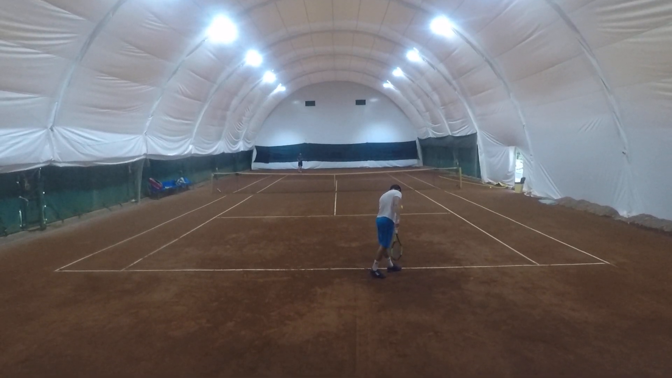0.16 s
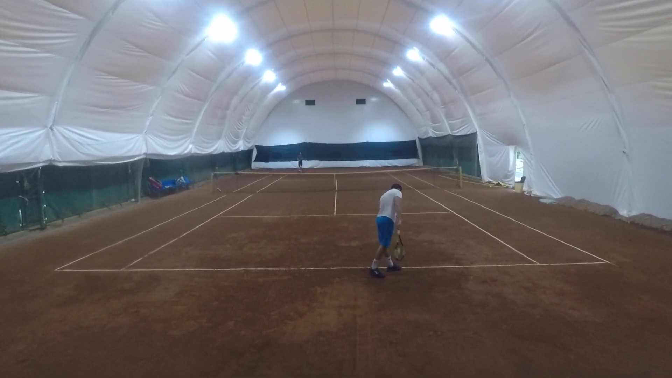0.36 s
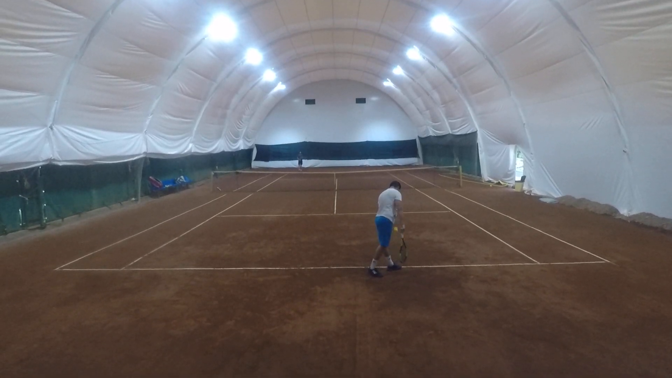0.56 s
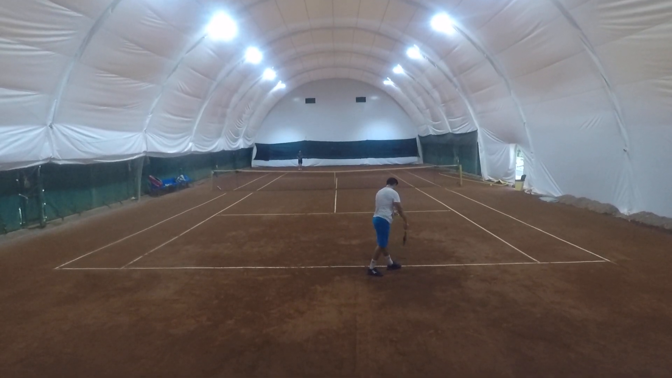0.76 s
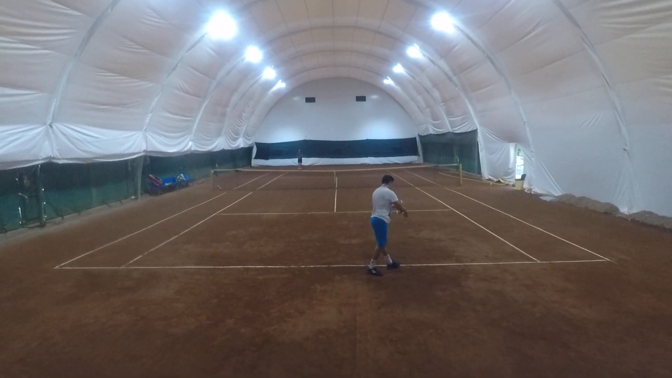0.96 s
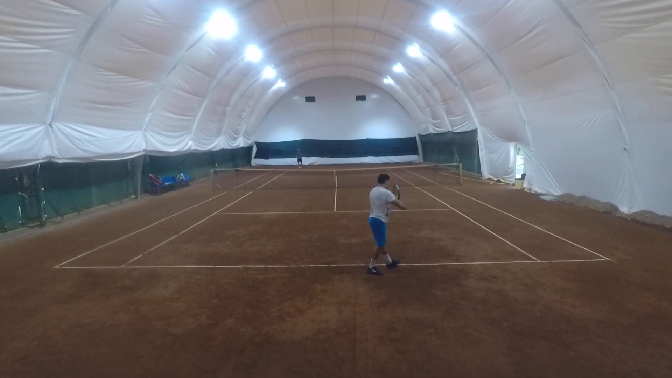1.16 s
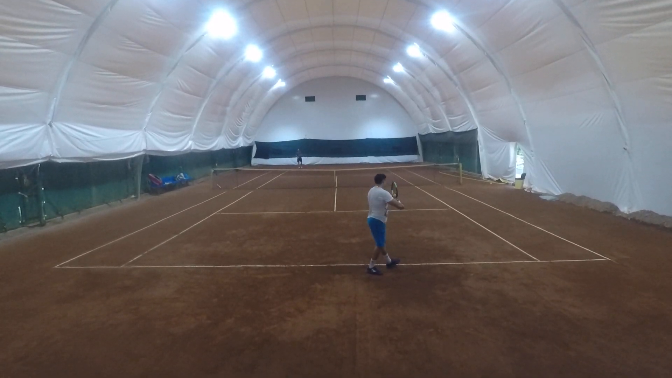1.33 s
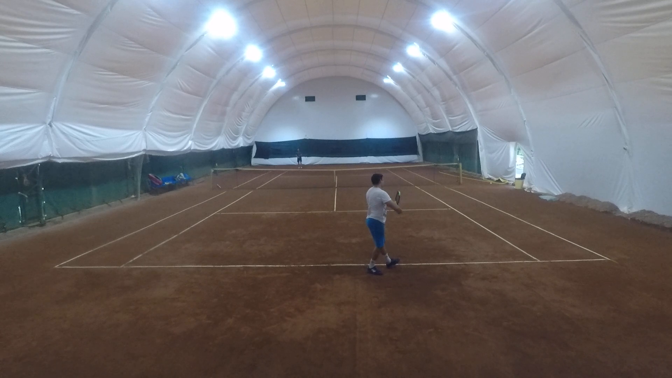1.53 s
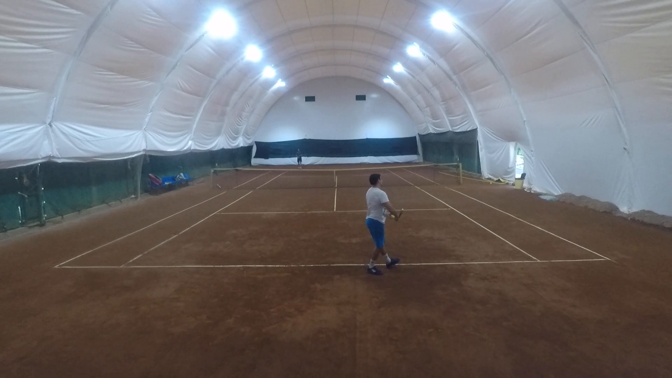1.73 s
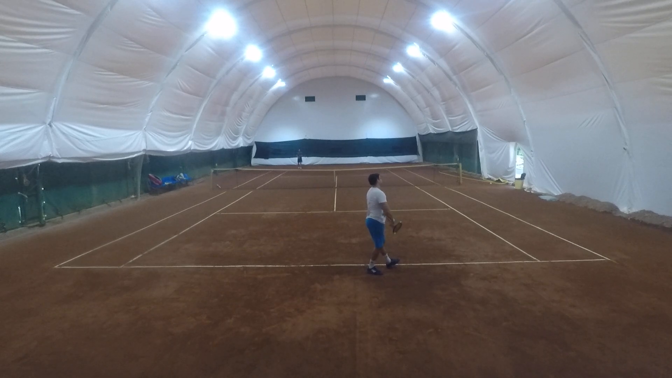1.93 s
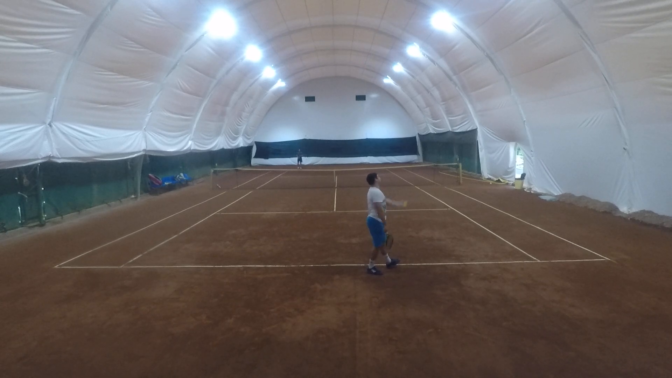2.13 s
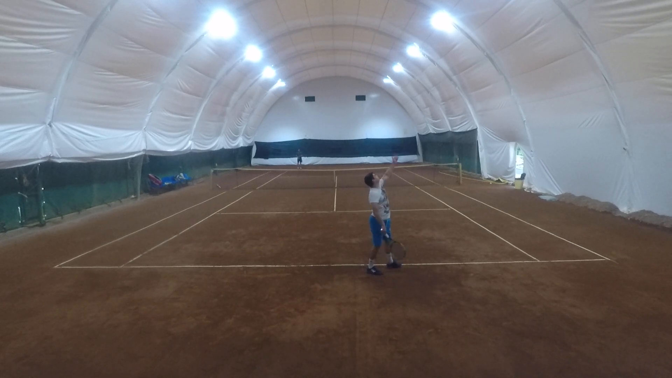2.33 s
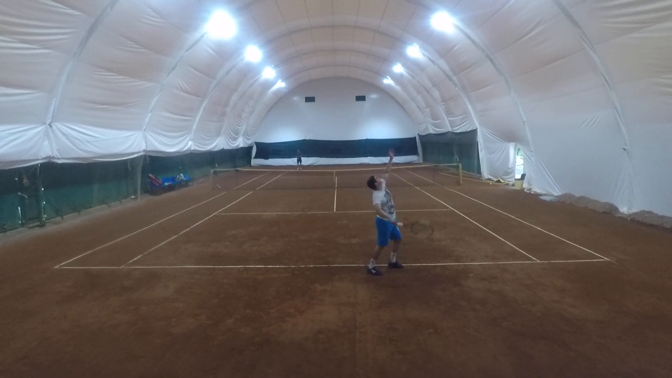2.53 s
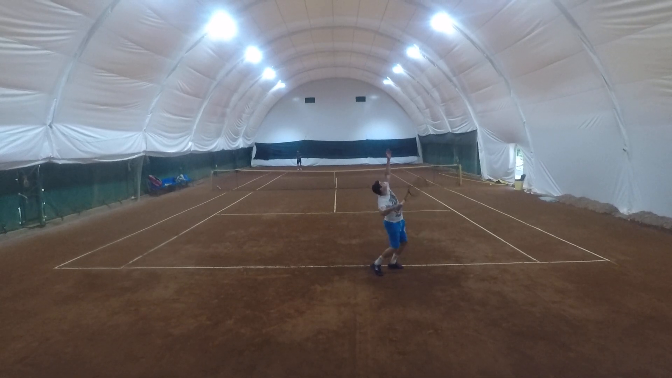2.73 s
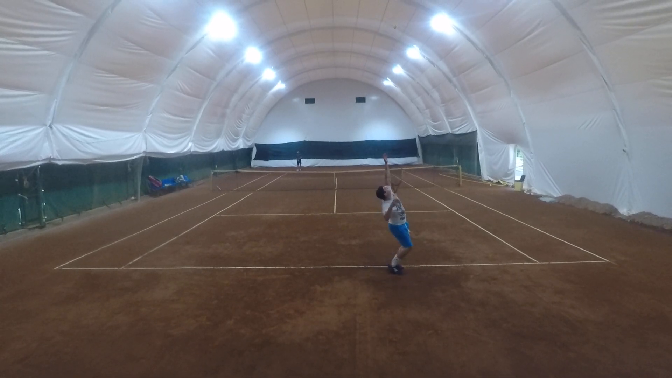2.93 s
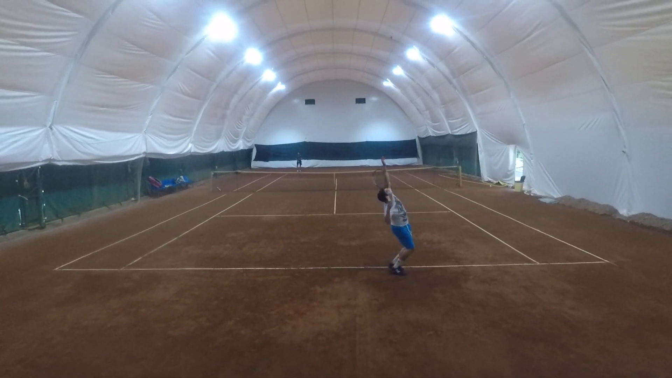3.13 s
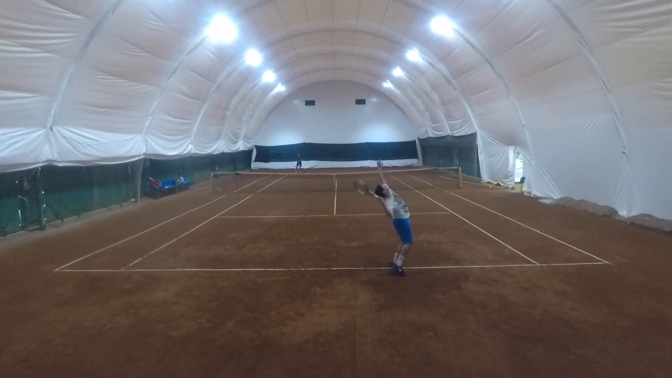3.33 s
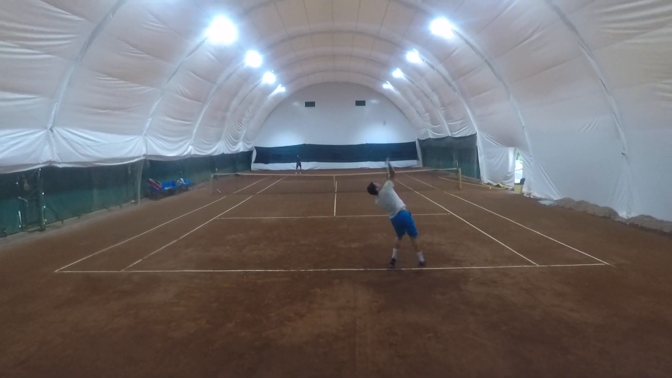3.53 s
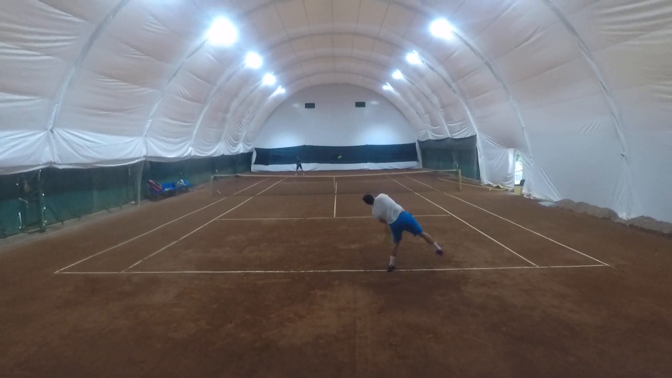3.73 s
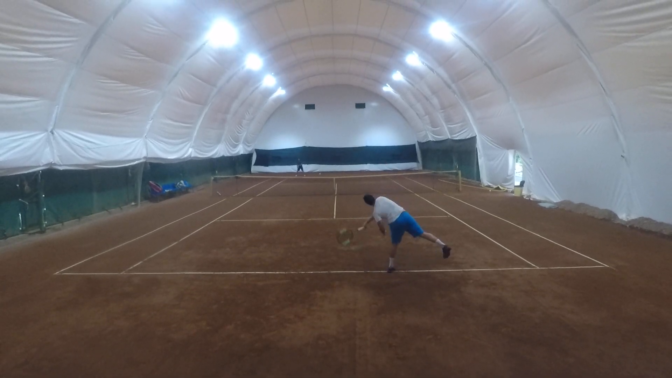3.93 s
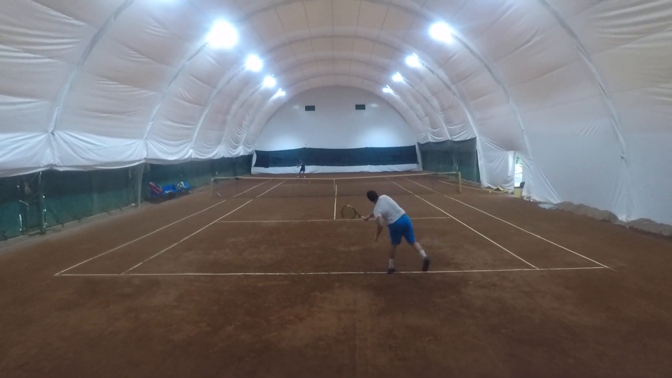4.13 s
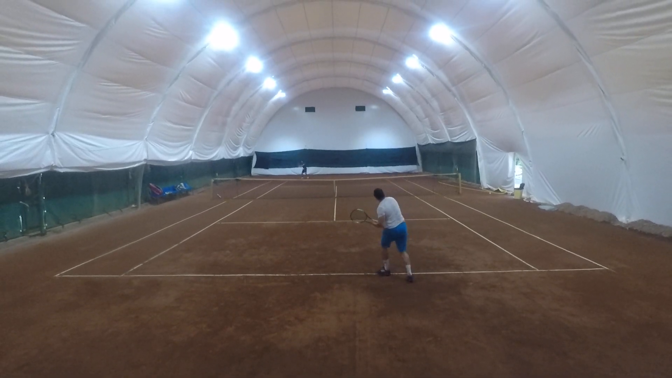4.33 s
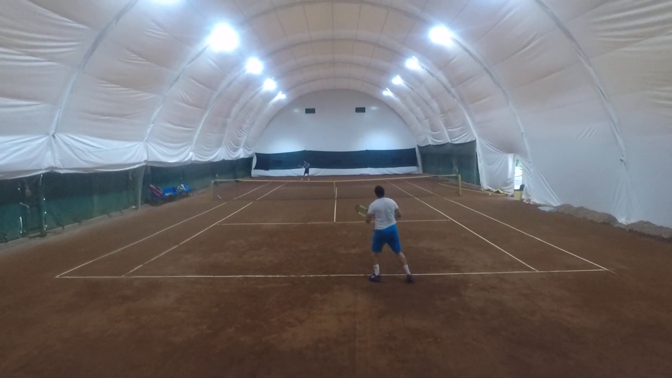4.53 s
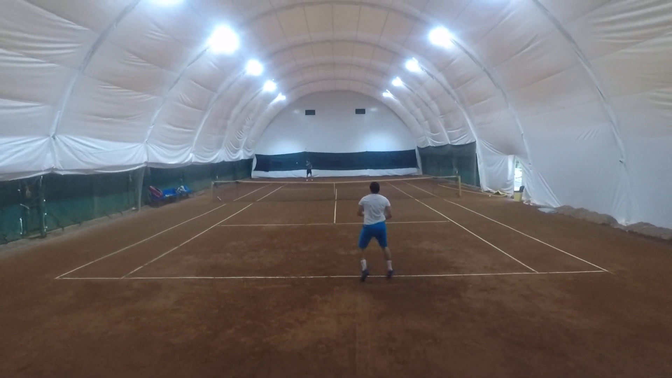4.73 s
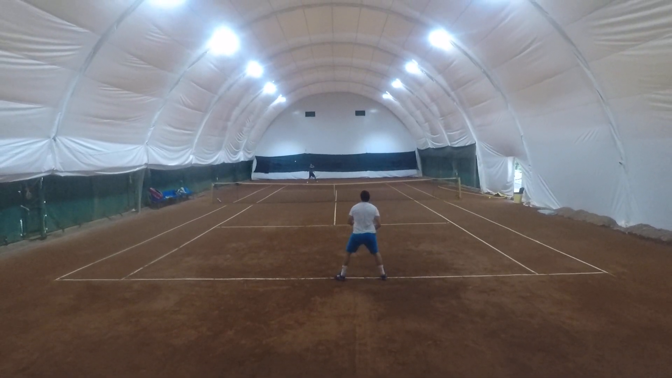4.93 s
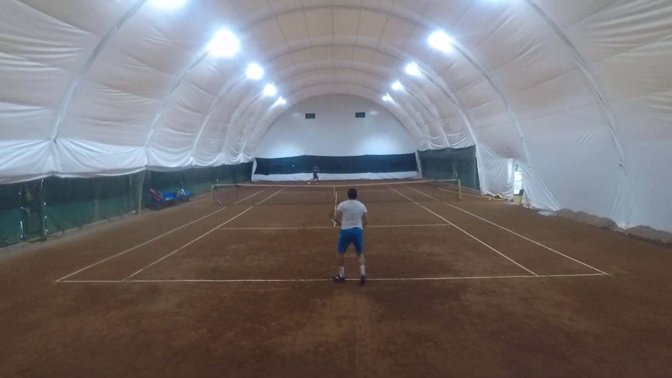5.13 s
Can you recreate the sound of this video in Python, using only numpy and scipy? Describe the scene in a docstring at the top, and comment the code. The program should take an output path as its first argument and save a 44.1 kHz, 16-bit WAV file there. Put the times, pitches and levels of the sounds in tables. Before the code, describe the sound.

Soft knocks and gritty scuffs over a fading hollow rumble, then a sharp racket hit, fluttering wall echoes, and a distant return stroke.

```python
"""Inflated fabric dome: a tennis serve heard by a small camera behind the baseline.
Hiss, frame ticks and rumble come from the camera; earlier strokes hang on as decaying coloured noise.
Knocks, jogging and dry ticks excite resonances; short cracks over thumps tap; a far stroke washes in.
The racket cracks (noise spray, ringing strings, short low thump), curved walls return noise bursts and
a long rush, and the return stroke renews it.
"""
import sys
import numpy as np
from scipy import signal
from scipy.fft import rfft, irfft, next_fast_len
from scipy.io import wavfile
from scipy.ndimage import uniform_filter1d

SR = 44100
rng = np.random.default_rng(int(sys.argv[2]) if len(sys.argv) > 2 else 0)


def dump(signal):
    """Clip the signal to [-1, 1] and save it as 16-bit WAV at the path in sys.argv[1]."""
    limited = np.clip(np.atleast_2d(signal).T, -1, 1)
    pcm = np.round(limited * 32767).astype(np.int16)
    wavfile.write(sys.argv[1], SR, pcm)


N = 228217

FRAME_RATE_HZ = 30000 / 1001
HISS_DB, TOP_HZ, LOW_CUT_HZ = -64.5, 15000, 129.8
GRIT_FROM_S, GRIT_TO_S, GRIT_COUNT = 0.43, 0.9, 26
GRIT_FLOOR_DB, GRIT_SPREAD_DB, GRIT_LOW_DB = -44.5, 4.5, -1

# Noise colours, all (frequency [Hz], relative density [dB])
# camera: microphone hiss, deep and upper rumble
HISS_COLOUR = [(1470, -24), (2500, 15.5), (2930, -33), (4840, -22.5), (5210, -47), (5790, -1), (7870, 2.5),
               (8680, 7), (13400, -5.5), (14300, -30), (15000, -32)]
DEEP_RUMBLE_COLOUR = [(13, -43), (22, -5), (50, 6), (70, -27), (120, -120)]
UPPER_RUMBLE_COLOUR = [(30, -120), (52, -25), (66, -4.5), (97, 0.5), (115, -3), (150, -67), (250, -120)]
# dome boom: fading, far, served
FADING_BOOM = [(62, -39), (105, -41), (118, -14), (135, 7), (156, -4.5), (243, -7), (472, -18), (504, -9.5),
               (600, -20), (780, -23), (1320, -120)]
FAR_BOOM = [(62, -75), (105, -30), (139, -1.5), (166, 1.5), (291, -8), (435, -7.5), (507, -16), (600, -15),
            (780, -19), (1320, -120)]
SERVED_BOOM = [(62, -120), (105, -25), (135, 6), (183, -5), (243, -7), (335, -3), (368, -4.5), (399, -1.5),
               (500, -6), (580, -13), (660, -120)]
# dome body: fading, rustle, far, served
FADING_BODY = [(320, -63), (550, -42), (575, -22), (739, -18), (881, -2.5), (1060, -1), (1150, -6),
               (1240, -3), (1310, -6), (3200, -24.5), (4160, -43), (7040, -120)]
RUSTLE_BODY = [(320, -38), (550, -14), (728, -7), (964, -7), (1100, -12), (1300, -3.5), (1860, -9),
               (2480, -2.5), (2720, -10), (3540, -9.5), (4200, -20), (5460, -44), (9240, -120)]
FAR_BODY = [(320, -21), (550, -9), (875, -1.5), (956, -5), (1520, -6), (1710, -4.5), (1830, -6),
            (3200, -15), (4160, -35), (7040, -120)]
SERVED_BODY = [(330, -30), (560, -6), (643, -5), (778, 0.5), (961, 0), (1210, -2), (1490, -7),
               (2360, -10.5), (2810, -16.5), (3200, -16), (4160, -23), (7040, -120)]
# dome sizzle; spray of the racket blow
SIZZLE = [(1760, -8.5), (3000, -2), (3470, 0), (3910, -2), (5150, -2.5), (6150, -0.5), (7400, -4),
          (10000, -23), (11300, -34), (13000, -34), (13800, -52), (14500, -64)]
CRACK = [(1290, -26), (2200, -3), (2250, -3), (2440, -13), (3310, -3), (5070, -9), (6720, 0.5), (8620, -13),
         (13000, -26), (15000, -25)]

# Microphone ports in a diffuse field:
# (frequency [Hz], likeness before scaling [0-1], left lead [rad], left-right [dB])
PORTS = [(30, 0.8, .3, -3), (70, 0.6, 0.66, 2.5), (158, 0.7, 1.25, 1), (306, 0.47, 0.45, -1.5),
         (480, 0.5, 0.41, 6.5), (617, 0.52, 4.95, -3), (970, 0.43, 4.5, -1.5), (1480, 0, 4.3, 0),
         (2230, 0.26, 7, 1.5), (3670, 0.53, 6.34, -0.5), (5200, 0.5, 5.2, -1), (8000, 0.05, 3.5, -2)]
# Camera rumble: (time [s], deep level [dB], upper level [dB])
RUMBLE_LEVELS = [(0.0, -65, -58), (0.06, -82, -83), (0.6, -74, -65), (0.86, -49, -43), (0.98, -48, -52.5),
                 (1.77, -56, -53.5), (1.8, -56, -39), (1.93, -56, -59), (3.28, -68, -67), (3.99, -69, -62),
                 (4.26, -51, -47), (4.61, -43, -36.5), (4.81, -43, -26.5), (4.85, -31, -39),
                 (4.88, -45, -35), (4.91, -46, -31), (5.07, -37, -40), (5.17, -42, -44)]

# Dome decay: boom, body, sizzle t60 [s]
DOME_T60_S = [4.5, 5.96, 2.35]
# Unceasing rush: boom, body, sizzle level [dB]
STEADY_DB = [-46.5, -56, -62.5]
# Strokes and bounces filling the dome:
# (time [s], build-up [s], boom [dB], body [dB], sizzle [dB], colour)
WASHES = [(-0.3, 0.046, -32.5, -36.5, -57, "fading"), (2.815, 0.047, -41, -42, -41.5, "rustle"),
          (2.865, 0.023, -40.5, -34, -38.5, "far"), (3.635, 0.023, -22.5, -37, -42, "served"),
          (3.71, 0.038, -21.5, -22.5, -31, "served"), (4.26, 0.0069, -41, -30, -37.5, "served"),
          (4.45, 0.05, -24.5, -35, -44.5, "served"), (4.712, 0.013, -27, -30, -38, "served"),
          (4.77, 0.051, -29.5, -26.5, -33, "served")]
# Feet, cloth and the racket cutting the air:
# (time [s], build-up [s], t60 [s], boom [dB], body [dB], sizzle [dB], colour)
SHUFFLES = [(0.45, 0.03, 1.76, -25, -35.5, -54, "fading"), (0.69, 0.016, 1.1, -23, -33.5, -54, "fading"),
            (2.32, 0.04, 3.3, -47, -58, -60, "rustle"), (2.385, 0.014, 4.6, -42.5, -48, -58, "rustle"),
            (2.43, 0.008, 0.18, -38, -52, -50, "rustle"), (2.482, 0.005, 0.66, -36, -49, -63, "rustle"),
            (3.39, 0.017, 0.83, -36.5, -54, -42.5, "far"), (3.56, 0.022, 0.43, -23, -38, -31, "far")]

# Resonances, all (frequency [Hz], width [Hz], level [dB], left lead [rad], left-right [dB])
# mount: ringing modes, dead thud, loose parts
MOUNT_MODES = [(146.8, 19.7, 9.5, 1.43, 4), (235, 32, -3.5, 3.8, 17), (438, 13.2, 8.5, 2.76, 10),
               (502.3, 11.3, 9, 2.77, 4)]
THUD_MODES = [(323, 174, -13, 4.1, 9.8)]
RATTLE_MODES = [(610, 97, -17, 7.1, 1), (1040, 170, -22, 3.6, -4), (1477, 100, 13, 2.48, -3.5),
                (2255, 150, 3, 1.5, 5.5), (3080, 160, -15, 3, -27), (6100, 620, -15, 2.3, -7)]
# dry ticks: lower and higher modes
TICK_LOW_MODES = [(1780, 430, -20, 0, 0), (2500, 210, -1, 0, 0), (3120, 270, -9.5, 0, 0)]
TICK_HIGH_MODES = [(4400, 880, -10, 0, 0), (5500, 520, -12, 0, 0), (6060, 280, -6, 0, 0),
                   (6800, 310, -11, 0, 0)]

# Knocks on the mount: (nominal time [s], level [dB], rattle [dB re level], dead thud [dB re level])
KNOCKS = [(0.145, -23.5, -33, 6.5), (0.378, -25.5, -28, -2), (0.497, -30, -4, -11), (0.518, -20, -11, -10),
          (0.56, -16.5, -15.5, -3), (0.623, -15.5, -22, -13), (0.653, -16.5, -15, -1), (0.701, -32, -5, 0),
          (0.7135, -23, -9, 16.5), (0.727, -14, -2, 6), (0.735, -12, -6.5, -6), (0.742, -24, -15, 5),
          (0.78, -17, -10, 1), (0.828, -18, -11.5, -25), (0.859, -17.5, -18, -17), (0.925, -26, -12, -10),
          (0.961, -28, -10.5, -11), (1.048, -29.5, -16, 2), (1.793, -13, -34, 8.5),
          (4.378, -12.5, -11, -22)]
# Shaking of the mount: (time [s], level [dB])
JOG = [(0.44, -48), (0.674, -56), (0.728, -23.5), (0.898, -54), (1.026, -35.5), (1.12, -78)]
# Dry ticks: (time [s], level [dB], lower modes [dB re level], left-right [dB])
TICKS = [(0.1417, -33.5, -24, -10), (0.3957, -31, -5.5, 11), (0.501, -23, -6.5, -4), (0.623, -40, 6, 0),
         (0.7134, -35, -14, -9), (1.3666, -22.5, -16.5, -10), (1.6247, -38.5, -5.5, 4.5),
         (1.792, -45.5, -5.5, -3), (2.4306, -40, 2, -1.0), (2.4464, -28, -16, -13), (2.4936, -40, 7.5, -4)]

# Short cracks over thumps: ball and feet on clay, a mount knock's click, the return stroke's thumps:
# (time [s], crack level [dB], thump [dB re crack], left-right [dB], thump frequency [Hz], thump t60 [s])
TAPS = [(0.4409, -23.5, 4, -1, 242, 0.024), (0.4657, -22.5, -24, 5, 180, 0.06),
        (0.4695, -25, -25, -16, 240, 0.06), (0.4812, -29, -3, 6, 174, 0.06),
        (1.7924, -35, -20, 0, 240, 0.034), (2.5055, -43.5, 20.5, -2, 180, 0.14),
        (2.5647, -41, 13, -3, 200, 0.053), (2.582, -46, 14.5, 0, 215, 0.15),
        (2.6502, -42, 11.5, 0.0, 167, 0.038), (4.224, -26, 11.5, -3, 170, 0.036),
        (4.7305, -22, 10, -1, 348, 0.032), (4.784, -23.5, 13, 4, 134, 0.15)]
# Modes of the short crack: (frequency [Hz], typical level [dB], t60 [s])
TAP_MODES = [(1107, 0, 0.016), (1436, 9, 0.0056), (2050, -3, 0.0082)]

# Wall slaps and the return stroke arriving from far:
# (nominal time [s], level [dB], boom [dB re level], sizzle [dB re level], left-right [dB])
SLAPS = [(3.6695, -25, -1, -2, 10), (3.684, -21, 2, -5.5, -14), (3.717, -12, -17, -6, 0.5),
         (3.7356, -16.5, -7, -10, -3), (3.767, -13, -22, -3, 1), (3.8034, -21, -13, -12, 5),
         (3.821, -16.5, 6.5, -6.5, 3), (4.044, -17, 8, -18, 8.5), (4.224, -22, -6, -9.5, 0),
         (4.265, -16.5, 0, -8.5, 0.0), (4.722, -12.5, 8.5, -12, -2), (4.757, -11.5, -8, -7.5, -6),
         (4.7805, -13.5, -9, -8.5, 2), (4.806, -13.5, -16, -14, 4), (4.847, -19.5, -1.5, -13.5, -20)]

# Racket crack and first hard reflections:
# (time [s], spray level [dB], knock [dB re spray], thump [dB re spray], thump length [s], left-right [dB])
STROKES = [(3.6005, -13.5, 4, 10, 0.0092, -5.5), (3.6055, -18, -2, 4, 0.0082, 8),
           (3.6195, -13, -19, 0, .011, -1), (3.6230, -23.5, 15, -3, .011, -9),
           (3.6318, -14, 0, -5, 0.014, -4), (3.6352, -27, 19, 21.5, 0.033, -5)]
# Low thump and string bed, both (frequency [Hz], typical level [dB], t60 [s])
THUMP_MODES = [(236, 10.5, 0.027), (352, 4.5, 0.028), (409, -5.5, 0.056)]
STRING_MODES = [(770, 9.5, 0.018), (1015, 3, 0.018), (1300, -2, 0.0068), (2400, -6, .008)]


def amp(db):
    """Amplitude factor from dB."""
    return 10 ** (np.asarray(db) / 20)


def unit(x):
    """Rms 1 in the mean of the channels."""
    return x / np.sqrt(np.mean(np.mean(x, axis=0) ** 2) + 1e-20)


def along(hz, f, v):
    """Points interpolated on a log frequency axis."""
    return np.interp(np.log(hz + 1), np.log(np.add(f, 1)), v)


def gains(rows):
    """One gain per sample for each dB column; -120 dB before the table, quick decay after it."""
    s, *columns = np.transpose(rows)
    t = np.arange(N) / SR
    after = np.clip(t - s[-1], 0, None)
    return [amp(np.interp(t, s, column, -120) - 60 * after / 0.12) for column in columns]


def filtered(x, response):
    """x through a complex frequency response."""
    m = next_fast_len(N + SR // 2)
    return irfft(rfft(x, m) * response(np.fft.rfftfreq(m, 1 / SR)), m)[..., :N]


def rush(spectrum, patchy_db, alike=1):
    """Noise, uneven over time and frequency, with the likeness, phase and balance of the two ports."""
    z = signal.stft(rng.standard_normal((2, N)), nperseg=512)[2]
    field = rng.standard_normal(z.shape[1:])
    field = uniform_filter1d(uniform_filter1d(field, 8, 0), 5, 1)
    patchy = z * amp(patchy_db * field / field.std())
    left, other = signal.istft(patchy, nperseg=512)[1][:, :N]
    f, like, lead, pan_db = np.transpose(PORTS)

    def share(hz):
        return np.clip(alike * along(hz, f, like), 0, 1)

    def turn(hz):
        return np.exp(-1j * along(hz, f, lead))

    def colour(hz):
        # unlike ports partly cancel in their sum; the colour is that of the sum
        summed = np.sqrt(0.5 + 0.5 * share(hz) * turn(hz).real)
        balance_db = np.outer([0.5, -0.5], along(hz, f, pan_db))
        return amp(along(hz, *np.transpose(spectrum)) + balance_db) / summed

    right = filtered(left, lambda hz: share(hz) * turn(hz))
    right = right + filtered(other, lambda hz: np.sqrt(1 - share(hz) ** 2))
    return unit(filtered(np.array([left, right]), colour))


def modes(table):
    """Response of both ports to a push on a body with these resonances."""
    side = np.array([[0.5], [-0.5]])

    def response(f):
        total = 0
        for centre, width, db, lead, pan_db in table:
            resonance = 1j * f * width / (centre * centre - f * f + 1j * f * width)
            total = total + amp(db + side * pan_db) * np.exp(1j * side * lead) * resonance
        return total

    return response


def ring(table, t, attack):
    """Damped sines at random strengths with a soft start, peak 1."""
    scatter = amp(2 * rng.standard_normal(len(table)))
    x = np.zeros(len(t))
    for strength, (hz, db, t60) in zip(scatter, table):
        x += strength * amp(db - 60 * t / t60) * np.sin(2 * np.pi * hz * t)
    x = x * (1 - np.exp(-t / attack))
    return x / np.abs(x).max()


def puff(t, rise, t60):
    """Envelope of a burst of scattered sound."""
    return (1 - np.exp(-t / rise)) * amp(-60 * t / t60)


def swell(s, rise, t60, db):
    """Power that builds up from s and dies away; rows are boom, body, sizzle."""
    t = np.clip(np.arange(N) / SR - s, 0, None)
    decay_db = np.reshape(db, (-1, 1)) - 60 * t / np.reshape(t60, (-1, 1))
    return ((1 - np.exp(-t / rise)) ** 2 * amp(decay_db)) ** 2


def add(out, s, x, pan_db):
    """Lay one event into the stereo track."""
    start = round(s * SR)
    out[:, start:start + x.shape[-1]] += amp([[pan_db / 2], [-pan_db / 2]]) * x


def camera():
    """The camera's own sounds: noise hiss, a high sine tick once a frame, low noise rumble."""
    t = np.arange(N) / SR
    left_s = (0.0113 - t) % (1 / FRAME_RATE_HZ)  # time until the tick stops; it swells up to then
    envelope = amp(-54.0 - 60 * left_s / 0.024) * np.clip(left_s / 0.00043, 0, 1)
    tick = envelope * np.sin(2 * np.pi * 8545 * t)
    deep, upper = gains(RUMBLE_LEVELS)
    rumble = deep * rush(DEEP_RUMBLE_COLOUR, patchy_db=0.5, alike=0.9)
    rumble = rumble + upper * rush(UPPER_RUMBLE_COLOUR, patchy_db=-0.5, alike=0.71)
    hiss = amp(HISS_DB) * rush(HISS_COLOUR, patchy_db=-0.5, alike=0.3)
    return hiss + tick + rumble


def dome():
    """Reverberation and nearby movement: event powers add in boom, body and sizzle, each with its decay."""
    colours = {"fading": (FADING_BOOM, FADING_BODY), "rustle": (FAR_BOOM, RUSTLE_BODY),
               "far": (FAR_BOOM, FAR_BODY), "served": (SERVED_BOOM, SERVED_BODY)}
    power = {name: np.zeros((3, N)) for name in colours}
    for band, name in enumerate(["far", "fading", "far"]):
        power[name][band] = amp(STEADY_DB[band]) ** 2
    for s, rise, *db, name in WASHES:
        power[name] = power[name] + swell(s, rise, DOME_T60_S, db)
    for s, rise, t60, *db, name in SHUFFLES:
        power[name] = power[name] + swell(s, rise, t60, db)
    # all colours share one sizzle
    out = np.sqrt(sum(power.values())[2]) * rush(SIZZLE, patchy_db=1.5)
    for name, (boom, body) in colours.items():
        low, mid, _ = np.sqrt(power[name])
        out = out + low * rush(boom, patchy_db=1.27) + mid * rush(body, patchy_db=0.56)
    return out


def mount():
    """Knocks travel through the mount and shake the two ports against each other."""
    blows, thuds, buzz = np.zeros((3, N + SR))
    t = np.arange(SR // 20) / SR
    push = np.sin(np.pi * np.clip(t / 0.0019, 0, 1)) ** 2  # a padded contact
    for s, db, rattle_db, thud_db in KNOCKS:
        start = round((s + 0.00079) * SR)
        span = slice(start, start + len(t))
        blows[span] += amp(db + 11) * push
        thuds[span] += amp(db + thud_db + 13.5) * push
        # loose parts chatter in spikes
        chatter = rng.standard_normal(len(t)) * rng.exponential(1, len(t)) ** 0.77
        buzz[span] += amp(db + rattle_db + 7.5) * puff(t, rise=0.00021, t60=0.073) * chatter
    shake = unit(filtered(rng.standard_normal(N), modes(MOUNT_MODES + THUD_MODES)))
    out = gains(JOG)[0] * shake
    out = out + filtered(blows[:N], modes(MOUNT_MODES))
    out = out + filtered(thuds[:N], modes(THUD_MODES))
    return out + filtered(buzz[:N], modes(RATTLE_MODES))


def grit():
    """Grit crackling while the foot scrapes: random fine ticks in the columns of TICKS."""
    rows = []
    for when, size, side in rng.random((GRIT_COUNT, 3)):
        s = GRIT_FROM_S + (GRIT_TO_S - GRIT_FROM_S) * when
        db = GRIT_FLOOR_DB - GRIT_SPREAD_DB * np.log(1 - size)
        rows.append((s, db, GRIT_LOW_DB, 12 * (side - 0.5)))
    return rows


def ticks():
    """Dry ticks: a noise snap of a few milliseconds through a few high resonances."""
    low, high = np.zeros((2, 2, N + SR))
    t = np.arange(SR // 50) / SR
    for s, db, low_db, pan_db in TICKS + grit():
        snap = amp(-60 * t / 0.0074) * rng.choice([-1, 1], len(t))
        add(high, s, amp(db + 6.5) * snap, pan_db)
        add(low, s, amp(db + low_db + 19) * snap, pan_db)
    return filtered(low[:, :N], modes(TICK_LOW_MODES)) + filtered(high[:, :N], modes(TICK_HIGH_MODES))


def taps():
    """Short cracks of damped sines, each over one lower damped sine as thump."""
    out = np.zeros((2, N + SR))
    t = np.arange(SR // 4) / SR
    for s, db, thump_db, pan_db, hz, t60 in TAPS:
        crack = ring(TAP_MODES, t, attack=0.0008)
        thump = amp(thump_db) * ring([(hz, 0, t60)], t, attack=0.0011)
        add(out, s, amp(db) * (crack + thump), pan_db)
    return out[:, :N]


def slaps():
    """Curved walls smear each echo into a short noise burst with the colour of the hall."""
    body, sizzle, boom = np.zeros((3, 2, N + SR))
    t = np.arange(SR // 5) / SR
    for s, db, boom_db, sizzle_db, pan_db in SLAPS:
        early_s = s - 0.003
        add(body, early_s, amp(db - 7.5) * puff(t, rise=0.0037, t60=0.11), pan_db)
        add(sizzle, early_s, amp(db + sizzle_db - 8.0) * puff(t, rise=0.0019, t60=0.092), pan_db)
        add(boom, s, amp(db + boom_db - 5.5) * puff(t, rise=0.0075, t60=0.21), pan_db)
    out = body[:, :N] * rush(SERVED_BODY, patchy_db=-2.5)
    out = out + sizzle[:, :N] * rush(SIZZLE, patchy_db=3.5)
    return out + boom[:, :N] * rush(SERVED_BOOM, patchy_db=4.0)


def strokes():
    """A spray of treble and the knock of the strings, with a short low thump just after the crack."""
    out, spray, near = np.zeros((3, 2, N + SR))
    t = np.arange(SR // 10) / SR
    for s, db, knock_db, thump_db, length_s, pan_db in STROKES:
        add(spray, s, amp(db - 5.5) * puff(t, rise=0.00066, t60=0.016), pan_db)
        # scattered by ground and player
        add(near, s, amp(db - 6) * puff(t, rise=0.0012, t60=0.048), pan_db)
        add(out, s, amp(db + knock_db) * ring(STRING_MODES, t, attack=0.00042), pan_db)
        hold = np.exp(-(t / length_s) ** 3)  # the thump holds, then stops short
        thump = hold * ring(THUMP_MODES, t, attack=0.0018)
        add(out, s + 0.00065, -amp(db + thump_db) * thump, pan_db / 2)
    out = out[:, :N] + spray[:, :N] * rush(CRACK, patchy_db=-2.0)
    return out + near[:, :N] * rush(SERVED_BODY, patchy_db=-2)


def scene():
    """Sum of the sources, low-cut except for the camera's own sounds."""
    # the housing muffles the top
    contacts = filtered(ticks() + mount(), lambda hz: np.exp(-(hz / 9500) ** 4))
    sound = dome() + contacts + taps() + slaps() + strokes()
    # the microphones pass almost no airborne sound below their low cut
    return filtered(sound, lambda hz: 1 / (1 + (LOW_CUT_HZ / (hz + 1)) ** 16)) + camera()


def record(dry):
    """The camera keeps nothing above its band limit."""
    return filtered(dry, lambda hz: hz < TOP_HZ)


dry = scene()
out = record(dry)
dump(out)
```